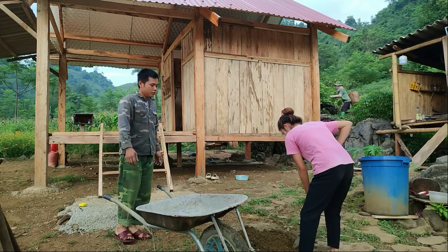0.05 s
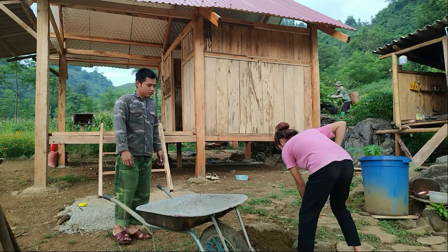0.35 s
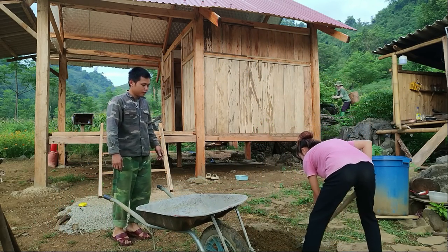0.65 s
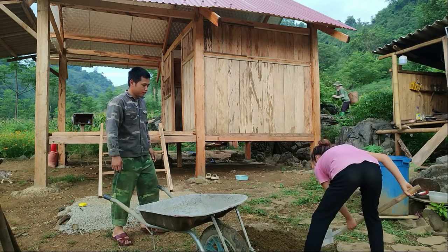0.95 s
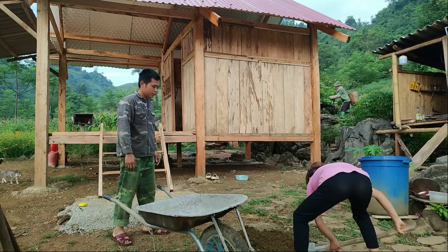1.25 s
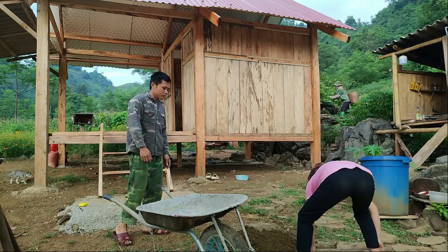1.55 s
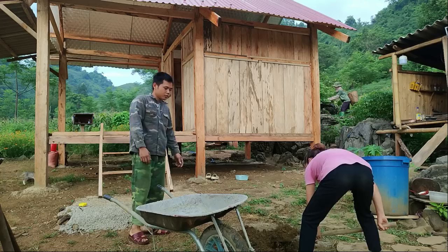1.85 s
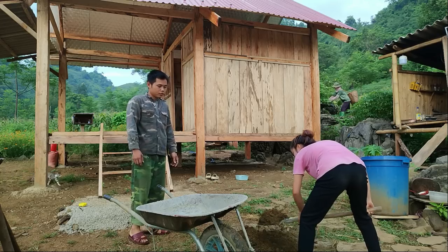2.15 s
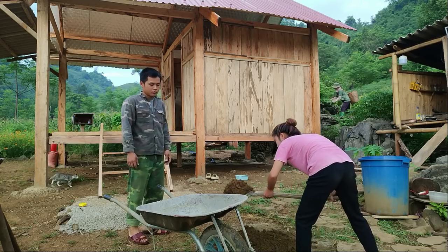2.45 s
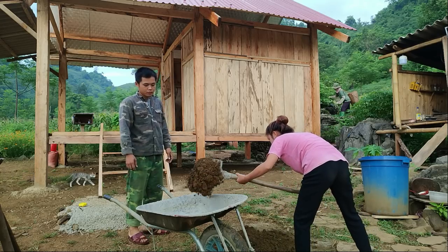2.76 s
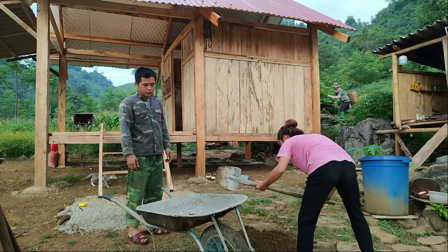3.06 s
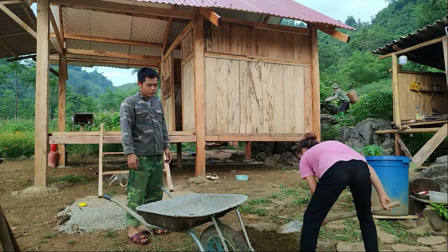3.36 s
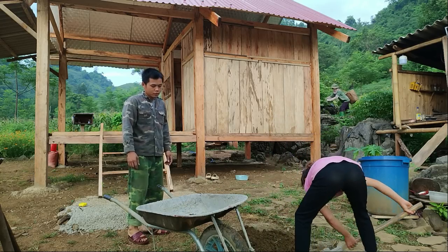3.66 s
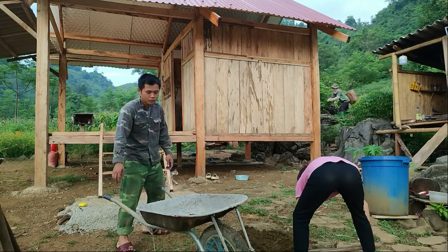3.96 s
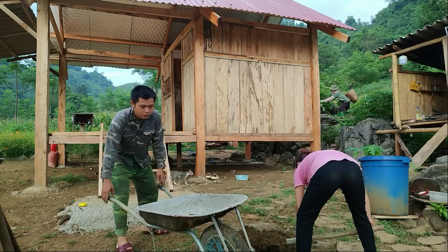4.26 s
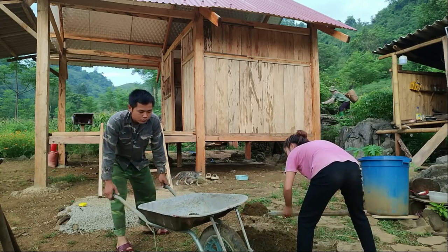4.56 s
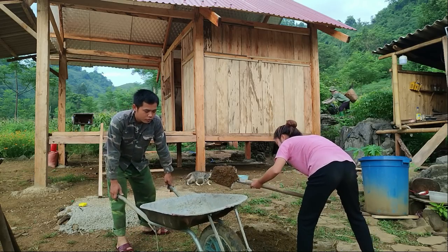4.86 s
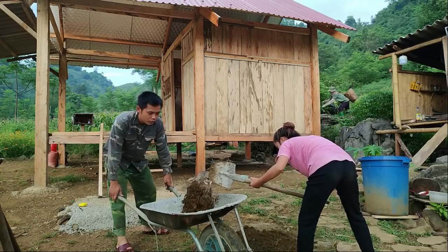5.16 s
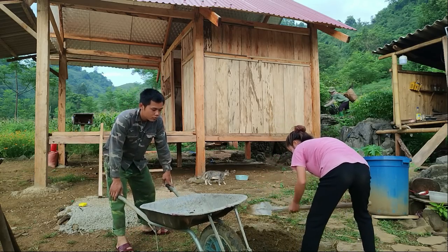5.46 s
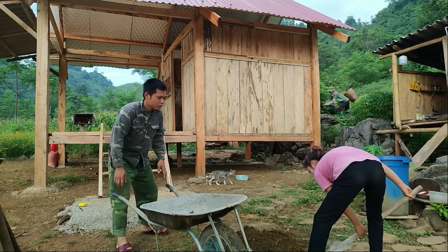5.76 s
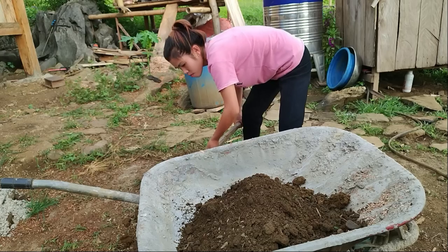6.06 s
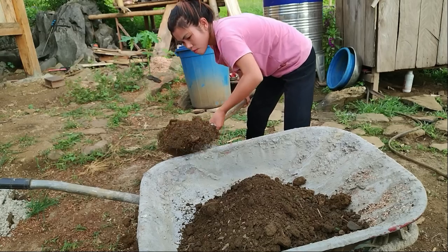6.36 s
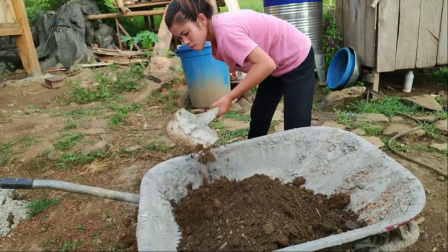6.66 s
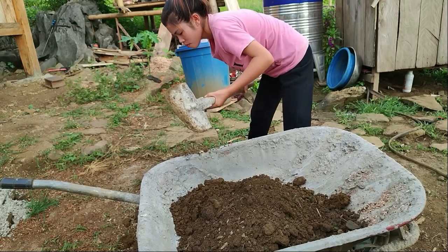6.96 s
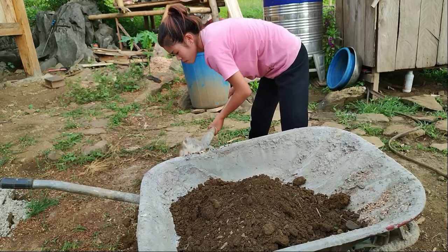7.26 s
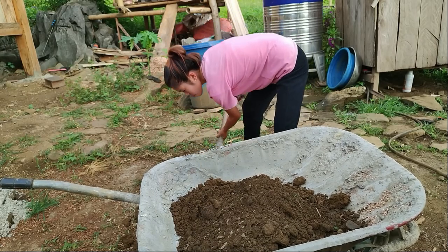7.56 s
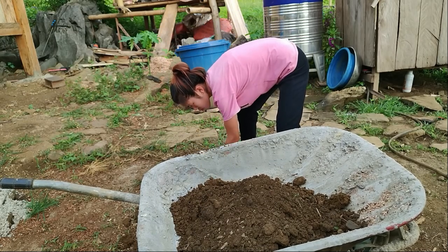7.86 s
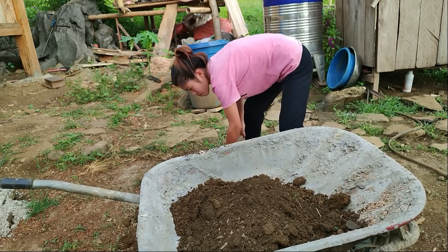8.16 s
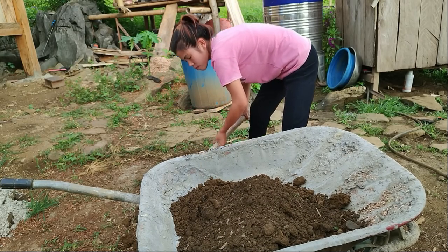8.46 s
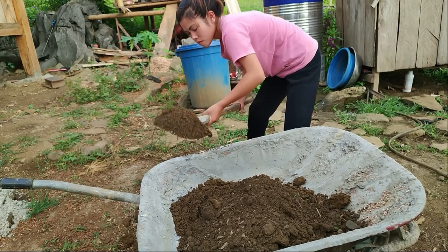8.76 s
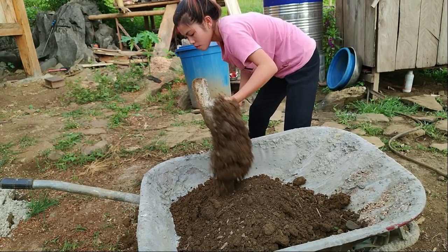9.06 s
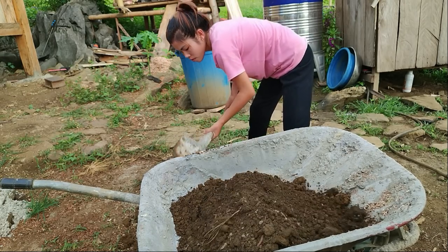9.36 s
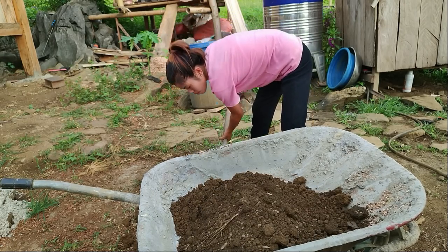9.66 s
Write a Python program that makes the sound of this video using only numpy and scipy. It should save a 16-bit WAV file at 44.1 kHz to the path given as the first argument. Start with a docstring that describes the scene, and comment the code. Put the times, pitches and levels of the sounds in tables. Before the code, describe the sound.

Outdoor shovelling: soil scrapes onto the blade, then thuds and trickles into a metal wheelbarrow while insects buzz and chirp.

```python
"""A shovel moves loose soil into a steel wheelbarrow in a rural yard, a few metres from the microphone.
The blade crunches into the heap and ticks on stones; each load thuds and trickles into the tray,
which clangs at first and booms once heaped. Insects drone and chirp all round, small birds call far
off and light wind rumbles. Near 6 s the level dips briefly; after that the insects are softer."""
import sys
import numpy as np
from scipy import signal
from scipy.fft import rfft, irfft, next_fast_len
from scipy.io import wavfile
from scipy.ndimage import uniform_filter1d

SR = 44100
rng = np.random.default_rng(int(sys.argv[2]) if len(sys.argv) > 2 else 0)


def bounce(signal):
    """Save signal as a 16-bit WAV file at the path given by the first command-line argument."""
    frames = np.transpose(np.atleast_2d(signal))
    limited = np.clip(frames, -1, 1)
    pcm = np.round(limited * 32767).astype(np.int16)
    wavfile.write(sys.argv[1], SR, pcm)


N = 433062
TIME = np.arange(N) / SR
TOP_HZ = 15650
LULL_S = 5.995  # from here on the tray is heaped and the insect chorus softer


def digging():
    """The blade pushes through the heap and knocks dully on the ground."""
    # pushes: (peak [s], build-up [s], 20 dB fade of lumps [s], relative lumps, crumbs, sand [dB])
    pushes = [(.6, .07, .09, -90, -85, -76), (1.28, .025, .1, -61, -59.5, -69),
              (1.318, .025, .06, -53, -55, -68), (1.35, .018, .07, -60, -53.5, -68),
              (1.376, .012, .05, -66, -54, -74), (1.43, .025, .1, -58, -53.5, -72),
              (1.52, .035, .1, -63, -59, -90), (3.752, .012, .22, -55, -51.5, -63),
              (3.826, .018, .12, -56, -49, -63.5), (3.863, .018, .055, -53, -46, -63.5),
              (3.915, .02, .12, -57, -51.5, -73), (3.945, .02, .09, -54.5, -51, -72),
              (3.98, .02, .08, -53.5, -51, -82), (4.595, .015, .15, -64, -60, -90),
              (7.733, .014, .1, -58, -60, -90), (7.79, .008, .1, -54, -56, -90),
              (7.83, .025, .08, -51.5, -53, -77), (7.865, .025, .11, -55, -52.5, -82),
              (7.912, .012, .06, -63, -56.5, -88), (7.963, .025, .04, -66, -58.5, -90),
              (8.535, .035, .14, -62.5, -59.5, -79), (8.695, .06, 0.2, -78, -69, -76),
              (9.44, 0.06, 0.13, -61.5, -59, -79.5)]
    # knocks on the ground: (time [s], relative level [dB], pitch [Hz])
    knocks = [(.13, -48.5, 500), (.66, -37.5, 480), (1.317, -40, 170), (1.348, -41, 950), (1.425, -41, 150),
              (1.846, -48, 1100), (2.847, -43, 1400), (3.746, -43, 160), (3.751, -41, 560),
              (3.857, -35, 700), (3.862, -36, 150), (3.863, -32, 1050), (4.61, -43, 387),
              (4.788, -44.5, 850), (4.933, -49, 750), (5.125, -49, 900), (5.83, -48, 950),
              (7.725, -44, 150), (7.81, -38, 110), (7.827, -30, 480), (7.851, -38, 600), (7.86, -42, 105),
              (7.909, -42, 600), (7.968, -45, 1100), (8.47, -45, 550), (9.513, -45, 320),
              (9.563, -34.5, 300)]
    levels = flow(pushes, contact_db=-7, grip_s=.008, crumb_fade=1, sand_fade=.9)
    crunch = soil(levels, lump_db=1, crumb_db=-.5, sand_db=16, clump_db=2, crumbs_per_s=560,
                  crumb_spread_db=3, lump_spread_db=2.5, low_cut_hz=69)
    return crunch + gain_of(-11) * thuds(knocks, decay_s=.0091, crumble=.74)


def tipping():
    """Soil slides off the blade and clods land in the barrow."""
    # pours: (peak [s], build-up [s], 20 dB fade of lumps [s], relative lumps, crumbs, sand [dB])
    pours = [(2.966, .003, .15, -53, -41.5, -59.5), (3.016, .034, .06, -35, -38, -56),
             (3.036, .02, .06, -39.5, -40.5, -56), (3.075, .014, .085, -43, -40.5, -58.5),
             (3.12, .02, .11, -48, -46.5, -67), (3.185, .006, .1, -60, -62, -90),
             (3.303, .01, .06, -68, -60.5, -86), (4.99, 0.081, 1.1, -62.5, -64, -90),
             (5.32, 0.063, 0.34, -52.5, -53, -68), (5.335, .011, 0.07, -38, -42.5, -54),
             (5.362, .016, .1, -46, -47, -60), (5.44, .012, .06, -57, -57, -73),
             (5.52, .06, .3, -57.5, -75, -90), (6.425, 0.018, .06, -36, -41, -64),
             (6.55, .05, .2, -53, -64, -80), (6.62, .05, .2, -56, -62, -78),
             (6.678, .032, .09, -44, -51.5, -74), (6.715, .015, .06, -47, -53, -76),
             (6.742, 0.018, 0.04, -46, -46.5, -70.5), (6.874, 0.011, 0.04, -50.5, -54.5, -81),
             (7.048, .04, 0.04, -54, -65, -88)]
    # clods landing: (time [s], relative level [dB], pitch [Hz])
    clods = [(2.994, -18, 330), (3.001, -22, 205), (3.005, -19, 520), (3.011, -15.5, 780),
             (3.018, -19, 560), (3.027, -17, 680), (3.043, -24, 400), (3.057, -23.5, 330), (3.07, -28, 680),
             (3.096, -34, 380), (3.11, -39, 860), (3.128, -38, 380), (3.182, -42, 650), (5.325, -31, 110),
             (5.326, -21, 500), (5.331, -21, 560), (5.345, -26, 520), (5.366, -33, 140), (5.395, -35, 330),
             (5.465, -42, 300), (5.535, -43, 330), (5.583, -40, 298), (5.637, -44, 270), (6.409, -16, 290),
             (6.417, -17, 300), (6.425, -16, 600), (6.44, -21.5, 310), (6.461, -28, 270), (6.473, -33, 250),
             (6.602, -41, 560), (6.632, -36, 350), (6.675, -36, 480), (6.712, -35, 500), (6.733, -34, 620),
             (6.745, -37, 140), (6.942, -30.5, 440), (7.047, -45, 480)]
    levels = flow(pours, contact_db=-10, grip_s=.003, crumb_fade=1.15, sand_fade=1.06)
    trickle = soil(levels, lump_db=-5, crumb_db=1.5, sand_db=14.5, clump_db=1.4, crumbs_per_s=1500,
                   crumb_spread_db=2.6, lump_spread_db=2.2, low_cut_hz=170)
    return trickle + gain_of(-9) * thuds(clods, decay_s=.0087, crumble=.27)


def flow(strokes, contact_db, grip_s, crumb_fade, sand_fade):
    """Soil moves at contact, builds to a peak and settles; gives the levels of lumps, crumbs and sand."""
    power, t = np.zeros((3, N)), np.arange(SR) / SR
    fade_speed = np.array([[1], [crumb_fade], [sand_fade]])
    for peak_s, build_s, fade_s, *sizes_db in strokes:
        build_db = contact_db * np.maximum(1 - t / build_s, 0)
        settle_db = -20 * fade_speed * np.maximum(t - build_s, 0) / fade_s
        level = np.minimum(t / grip_s, 1) * gain_of(np.array(sizes_db)[:, None] + build_db + settle_db)
        add(power, peak_s - build_s, level ** 2)
    return np.sqrt(power)


def soil(levels, lump_db, crumb_db, sand_db, clump_db, crumbs_per_s,
         crumb_spread_db, lump_spread_db, low_cut_hz):
    """Dull lumps, crunching crumbs and hissing sand move together, in clumps, under each stroke."""
    # spectra of the three grain sizes: (frequency [Hz], relative level [dB])
    lump_spectrum = [(40, -19), (90, -0.5), (160, 1), (260, -3), (480, 0.5), (700, -5.5), (1200, -41.5),
                     (3000, -78)]
    crumb_spectrum = [(200, -31.5), (450, -18), (700, -0.5), (1100, -3.5), (2000, -4), (3000, -8.5),
                      (4500, -13), (7500, -17), (15000, -63)]
    sand_spectrum = [(800, -16), (2500, 9), (4000, 4), (6000, 0.5), (7600, 6.5), (9200, -6.5),
                     (11800, -3.5), (15500, -15.5)]
    moving = levels * evened(gain_of(clump_db * wander(130)))
    lumps = colour(moving[0] * grains(700, lump_spread_db, life_s=.0049), lump_spectrum)
    lumps = filtered(lumps, low_cut_hz, "high")
    crumbs = colour(moving[1] * grains(crumbs_per_s, crumb_spread_db, life_s=.0037), crumb_spectrum)
    sand = colour(moving[2] * grains(1400, spread_db=1.4, life_s=.00046), sand_spectrum)
    return gain_of(lump_db) * lumps + gain_of(crumb_db) * crumbs + gain_of(sand_db) * sand


def grains(per_s, spread_db, life_s):
    """Grains break in brief bursts at random moments, a few of them large."""
    sizes = gain_of(spread_db * np.minimum(rng.exponential(1, N), 4))
    breaks = sizes * (rng.random(N) < per_s / SR)
    power = signal.lfilter([1], [1, -np.exp(-2 / (life_s * SR))], breaks ** 2)
    return evened(np.sqrt(power) * noise())


def thuds(blows, decay_s, crumble, rise_cycles=.7):
    """Each blow shakes its target for a cycle or two and sheds a puff of crumbling earth."""
    out, t = np.zeros((2, N)), np.arange(SR // 8) / SR
    for s, db, hz in blows:
        age = hz * t / rise_cycles
        shake = np.sin(2 * np.pi * hz * t) * age * np.exp(1 - age)
        puff = filtered(noise(len(t)), [hz / 2, hz * 2], "band")
        blow = crumble * evened(puff) * np.exp(-t / decay_s)
        blow[0] += shake  # mid channel only
        add(out, s, gain_of(db) * blow)
    return out


def stones(reach=.4, rasp_db=-18, rasp_s=.012, bite_s=.0008):
    """Stones snap against the steel, each with a faint rasp after it."""
    # stone strikes: (time [s], relative level [dB], band centre [Hz], decay [s])
    strikes = [(.129, -51, 1900, .003), (.14, -50, 1500, .003), (.66, -56, 1680, .005),
               (1.0043, -31, 5600, .0009), (1.264, -51, 7300, .005), (1.306, -47, 1400, .003),
               (1.318, -49, 7200, .005), (1.322, -45, 1700, .0023), (1.347, -42.5, 1800, .0035),
               (1.356, -47, 1400, .002), (1.374, -45, 2100, .0025), (1.427, -48, 1900, .0034),
               (1.451, -50, 1500, .002), (2.965, -41, 2600, .005), (3.014, -34, 1200, .004),
               (3.019, -39, 7000, .003), (3.021, -35, 1500, .003), (3.032, -40, 9050, .005),
               (3.033, -34, 1600, .004), (3.07, -38, 2200, .004), (3.08, -46, 6500, .003),
               (3.111, -43, 1700, .003), (3.142, -47, 2500, .003), (3.751, -34, 6600, .0024),
               (3.77, -36, 6300, .0024), (3.797, -43, 6200, .003), (3.822, -37, 5100, .004),
               (3.831, -42, 3500, .003), (3.856, -36, 1650, .005), (3.863, -33.5, 1470, .004),
               (3.863, -35, 7000, 0.0035), (3.944, -46, 3300, .003), (3.975, -44, 2100, .004),
               (5.305, -47, 8000, .004), (5.328, -36.5, 11000, .004), (5.352, -38, 2100, .003),
               (5.382, -41, 2300, .003), (5.432, -55.5, 9000, .007), (6.432, -37, 1450, .0056),
               (6.739, -42, 1090, .005), (7.829, -45, 2200, .003), (7.859, -44, 1600, .004),
               (7.877, -46, 1600, 0.0029), (7.91, -48, 1500, .003), (9.379, -45.5, 4480, .0025),
               (9.446, -47.5, 1700, .005)]
    out, t = np.zeros((2, N)), np.arange(SR // 12) / SR
    for s, db, hz, decay_s in strikes:
        edges_hz = [hz / (1 + reach), min(hz * (1 + reach), TOP_HZ)]
        fade = np.exp(-t / decay_s) + gain_of(rasp_db) * np.exp(-t / rasp_s)
        fade *= np.minimum(t / bite_s, 1)
        snap = filtered(fade * noise(len(t)), edges_hz, "band")
        add(out, s, gain_of(db) * evened(snap) * np.sqrt(np.mean(fade ** 2)))
    return out


def blade(push, ticks):
    """Soil rings the blade's low modes; only stones reach the high ones."""
    # blade modes: (frequency [Hz], relative level [dB], t60 [s])
    low_modes = [(610, -7, 0.054), (1080, -4, .04), (1380, 0, 0.1), (1705, 3, .04), (2150, -8, .03)]
    high_modes = [(5750, -5, .03), (6850, -1, .04), (7550, 0, .04), (10400, -13, .025)]
    return gain_of(4.5) * ring(push, low_modes) + gain_of(4) * ring(ticks, high_modes)


def tray(load):
    """The nearly empty tray clangs until soil buries the steel; heaped, it only booms."""
    # tray modes: (frequency [Hz], relative level nearly empty [dB], the same heaped [dB], t60 [s])
    modes = [(170, -10, -15, .11), (224, -26, -4.5, .3), (241, -14, 4, .115), (323.2, 3.5, 0, .14),
             (378, -10, 1.5, .13), (435, -3, -15, .28), (520, 2, -10, .2), (635, -6, -1, .1),
             (733, -2, -11, .18), (856.5, -0.5, -9, .17), (950, -11, -3, .11), (1040, -7, -4, .12),
             (1205, -7, -8, .15), (1295, -8, -19, .15), (1695, -5, -11, .11)]
    # how freely the steel rings under the first loads: (time [s], gain [dB])
    bare_steel = [(2.96, 7), (3.04, 7.5), (3.12, 3.5), (5.3, -1.5)]
    hz, empty_db, heaped_db, t60 = np.transpose(modes)
    heaped = TIME > LULL_S
    clang = ring(load * ~heaped * gain_of(curve(bare_steel)), zip(hz, empty_db, t60))
    boom = ring(load * heaped, zip(hz, heaped_db, t60))
    return clang + gain_of(8.3) * boom


def ring(force, modes):
    """Struck steel rings at its decaying modes; the strongest has gain 1."""
    t = np.arange(SR // 2) / SR
    response = sum(gain_of(db - 60 * t / t60) * np.cos(2 * np.pi * hz * t) for hz, db, t60 in modes)
    return signal.oaconvolve(force, response[None] / abs(rfft(response)).max(), axes=1)[:, :N]


def yard(x, t60, dull_hz):
    """Timber walls and foliage send scattered, dull reflections back to the microphone."""
    t = np.arange(SR // 2) / SR
    echoes = noise(len(t)) * (rng.random((2, len(t))) < 2500 / SR)
    echoes *= (t > .006) * gain_of(-60 * t / t60)
    echoes = signal.lfilter(*signal.butter(1, dull_hz, fs=SR), echoes / np.linalg.norm(echoes[0]))
    return signal.oaconvolve(x, echoes, axes=1)[:, :N]


def insects(swell_db=.7, flutter_db=1.6):
    """All round the yard, each kind of insect fills its own band, fluttering and slowly swelling."""
    # chorus bands: (centre [Hz], width [Hz], level before the lull [dB], level after it [dB])
    chorus = [(2600, 340, -66, -69), (4080, 430, -72, -67.5), (4300, 80, -65.5, -70.5),
              (4430, 16, -70.5, -80), (4650, 30, -73, -82), (4600, 640, -63.5, -65.5),
              (5580, 270, -63.5, -68), (6230, 770, -68.5, -73.5), (7480, 476, -67, -70),
              (9800, 700, -78, -80.5)]
    out = np.zeros((2, N))
    for hz, width_hz, before_db, after_db in chorus:
        db = np.where(TIME > LULL_S, after_db, before_db)
        out += band(hz, width_hz) * gain_of(db + swell_db * wander(1.74) + flutter_db * wander(70))
    return out


def cricket(throb_db=1.5):
    """One cricket trills thinly on and off, throbbing unevenly."""
    # trills: (start [s], end [s], level [dB])
    trills = [(1.35, 1.682, -72), (3.526, 3.78, -74), (4.1, 4.477, -72.5), (4.55, 5.6, -72),
              (5.667, 6.0, -73), (6.2, 6.65, -72), (6.9, 7.4, -74), (7.45, 8.3, -73), (8.4, 9.5, -73.5)]
    level = np.zeros(N)
    for start, end, db in trills:
        add(level, start, gain_of(db) * signal.windows.tukey(round((end - start) * SR), .5))
    return level * gain_of(throb_db * wander(25)) * band(2892, width_hz=36)


def chirper(period_s=.2201, step_s=.037):
    """A steady chirper repeats three quickly falling notes, no two alike."""
    # its loudness: (time [s], level [dB])
    loudness = [(0, -53.3), (5.9, -54), (6.4, -64), (9.8, -65)]
    out = np.zeros((2, N))
    for s in np.arange(.151, TIME[-1], period_s):
        for k, accent_db in enumerate([-3.5, 0, 0]):
            length_s, top_hz, bottom_hz = (.028, 4970, 4320) * (1 + .01 * rng.standard_normal(3))
            note = whistle(length_s, top_hz, bottom_hz)
            db = curve(loudness, s) + accent_db + rng.standard_normal()
            add(out, s + (k - 1) * step_s, gain_of(db) * note)
    return out


def birds(pitch_spread=.03, timing_spread_s=.003):
    """Small birds far off give single pips and short runs of notes."""
    # calls: (time [s], notes, spacing [s], note length [s], glide from [Hz], to [Hz],
    # pitch sag at both ends [share], level [dB])
    calls = [(1.467, 5, .029, 0.02, 2950, 2900, .2, -58), (2.09, 10, .0315, 0.02, 2750, 2850, 0.18, -59),
             (2.435, 6, .072, 0.018, 6450, 6900, .04, -59.5), (6.012, 1, .1, 0.033, 3970, 3250, 0, -56.5),
             (7.154, 1, .1, .054, 4330, 3030, 0, -61), (8.434, 1, .1, .028, 4400, 3950, 0, -60),
             (8.479, 1, .1, .048, 4220, 3120, 0, -59.5), (8.594, 1, .1, .028, 4550, 4100, 0, -61)]
    out = np.zeros((2, N))
    for s, notes, spacing_s, length_s, from_hz, to_hz, sag, db in calls:
        for k in range(round(notes)):
            sharp, late_s = (pitch_spread, timing_spread_s) * rng.standard_normal(2)
            note = whistle(length_s, from_hz * (1 + sharp), to_hz * (1 + sharp), sag)
            add(out, s + k * spacing_s + late_s, gain_of(db + 1.5 * rng.standard_normal()) * note)
    return out


def whistle(length_s, from_hz, to_hz, sag=0):
    """A slightly raspy glide, lowered at both ends by sag, reaching left and right out of step."""
    progress = np.linspace(0, 1, round(length_s * SR))
    rasp = .018 * evened(uniform_filter1d(rng.standard_normal(len(progress)), size=60))
    glide_hz = from_hz + (to_hz - from_hz) * progress
    hz = glide_hz * (1 + sag * (np.sin(np.pi * progress) - 1) + rasp)
    cycles = np.cumsum(hz) / SR + rng.random() + np.array([[0], [.17]])
    return np.sin(2 * np.pi * cycles) * signal.windows.tukey(len(hz), .8)


def wind():
    """Soft gusts rumble, different on each side of the microphone, under a faint wide hiss."""
    # wind and distant air: (frequency [Hz], relative level [dB])
    spectrum = [(10, -3), (25, -4), (50, -13), (100, -13.5), (200, -16), (500, -22), (1000, -25.5),
                (1700, -27.5), (3300, -40), (9000, -38), (12000, -39), (15500, -47)]
    # left-right likeness of the hiss: (frequency [Hz], coherence [0-1])
    likeness = [(25, 1), (120, 0.35), (300, 0.35), (700, 0.3), (1500, 0), (4000, 0.24)]
    # strength of the breeze: (time [s], relative level [dB])
    breeze = [(0, 9), (4.7, 9.5), (5.35, 20), (5.8, 12), (6.1, 14), (6.3, 19), (6.7, 11), (7, 7.5),
              (9.8, 12.5)]
    hiss = stereo(colour(noise(), spectrum), likeness)
    rumble = filtered(colour(noise(), spectrum), 70, "low")
    gusts = gain_of(curve(breeze) - 4 + .5 * wander(2.1))
    return gain_of(-64) * (hiss + gusts * rumble)


def gain_of(db):
    """Decibels to amplitude."""
    return 10 ** (np.asarray(db) / 20)


def evened(x):
    """Scales to rms 1."""
    return x / np.sqrt(np.mean(x ** 2) + 1e-20)


def noise(samples=N):
    """Two unrelated channels of white noise."""
    return rng.standard_normal((2, samples))


def filtered(x, hz, kind):
    """Second-order Butterworth filter."""
    return signal.sosfilt(signal.butter(2, hz, kind, fs=SR, output="sos"), x)


def curve(points, s=TIME):
    """Reads (time, value) points at time s."""
    return np.interp(s, *np.transpose(points))


def read(points, hz):
    """Reads a spectrum on a log-frequency axis."""
    f, value = np.transpose(points)
    return np.interp(np.log(hz + 1), np.log(f + 1), value)


def add(mix, s, sound):
    """Mixes a sound in at time s."""
    part = mix[..., max(round(s * SR), 0):][..., :sound.shape[-1]]
    part += sound[..., :part.shape[-1]]


def wander(per_s):
    """Random drift of rms 1 that turns per_s times a second."""
    return evened(np.interp(TIME * per_s, np.arange(N // 20), rng.standard_normal(N // 20)))


def colour(x, spectrum, size=4096):
    """Causal filter with the given spectrum, keeping the power of white noise."""
    log_gain = np.log(gain_of(read(spectrum, abs(np.fft.fftfreq(size, 1 / SR)))))
    taps = np.fft.ifft(np.exp(np.conj(signal.hilbert(log_gain)))).real[:size // 2]
    return signal.oaconvolve(x, taps[None] / np.linalg.norm(taps), axes=1)[:, :N]


def band(hz, width_hz):
    """Noise of rms 1 in a bell-shaped band, unrelated left and right."""
    size = next_fast_len(N)
    bell = np.exp(-((np.fft.rfftfreq(size, 1 / SR) - hz) / (2 * width_hz)) ** 2)
    return evened(irfft(bell * rfft(noise(size)), size)[:, :N])


def stereo(mid_side, likeness):
    """Turns unrelated mid and side into left and right that share their bass."""
    size = next_fast_len(N)
    same = np.clip(read(likeness, np.fft.rfftfreq(size, 1 / SR)), 0, 1)
    mid, side = rfft(mid_side, size) * np.sqrt([(1 + same) / 2, (1 - same) / 2])
    return irfft(np.array([mid + side, mid - side]), size)[:, :N]


def scene():
    """Shovel and barrow a few metres off; behind them wind and, slightly to the right, wildlife."""
    # left-right likeness of the shovelling: (frequency [Hz], coherence [0-1])
    likeness = [(60, .9), (150, .98), (350, .96), (640, .8), (1400, .3), (3000, 0)]
    push, load = digging(), tipping()
    ticks = gain_of(.5) * stones()
    work = push + load + ticks + blade(push, ticks) + tray(load)
    near = stereo(work + gain_of(-11) * yard(work, t60=.18, dull_hz=4050), likeness)
    air = wind()
    drone = insects() + cricket()
    chirps, pips = chirper(), birds()
    foliage = gain_of(-7) * yard(chirps + 2 * pips, t60=.1, dull_hz=8150)  # far birds blur more
    wildlife = drone + chirps + pips + foliage
    return near + air + wildlife * gain_of([[-.6], [.6]])


def record(dry):
    """The level drops away for a moment and swells back; the highest treble is cut."""
    # overall level through the lull: (time [s], gain [dB])
    lull = [(5.981, -2.5), (5.99, -40), (6.01, -40), (6.02, -13), (6.11, -5.5), (6.3, .5)]
    low_pass = signal.firwin(511, TOP_HZ, window=("kaiser", 9), fs=SR)
    return signal.oaconvolve(dry * gain_of(curve(lull)), low_pass[None], "same")


dry = scene()
out = record(dry)
bounce(out)
```